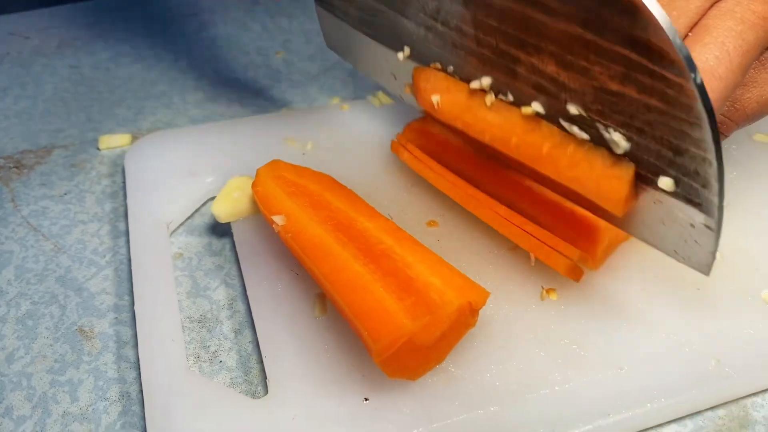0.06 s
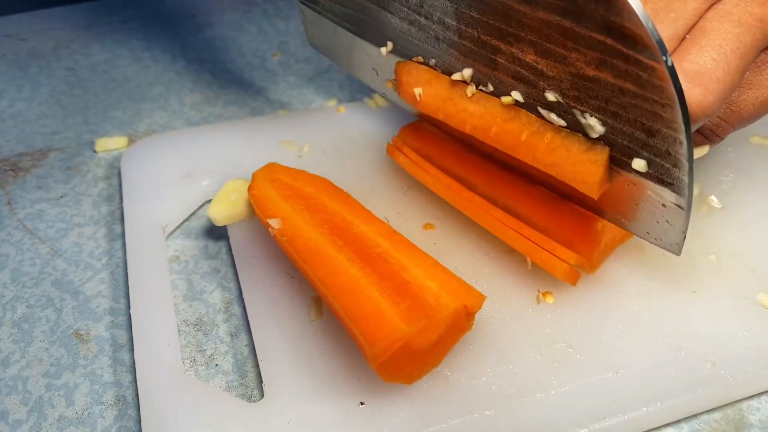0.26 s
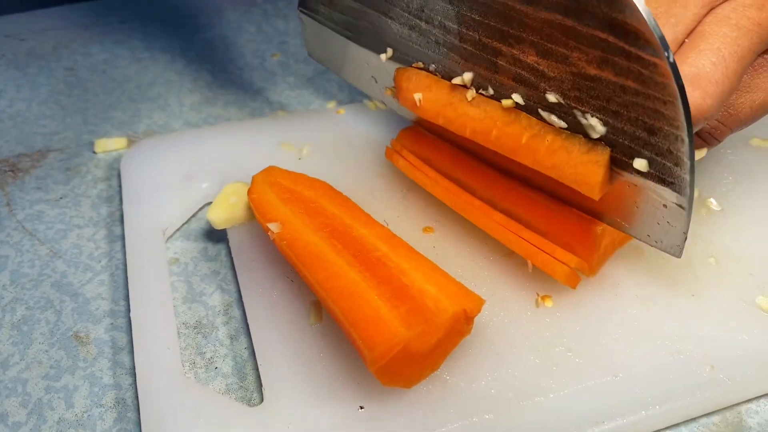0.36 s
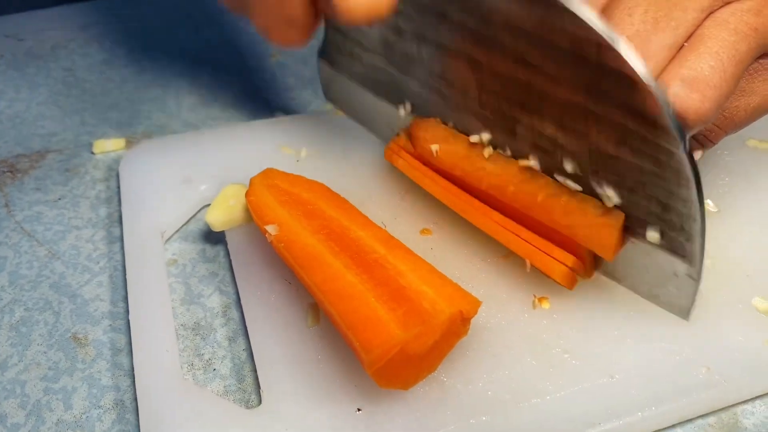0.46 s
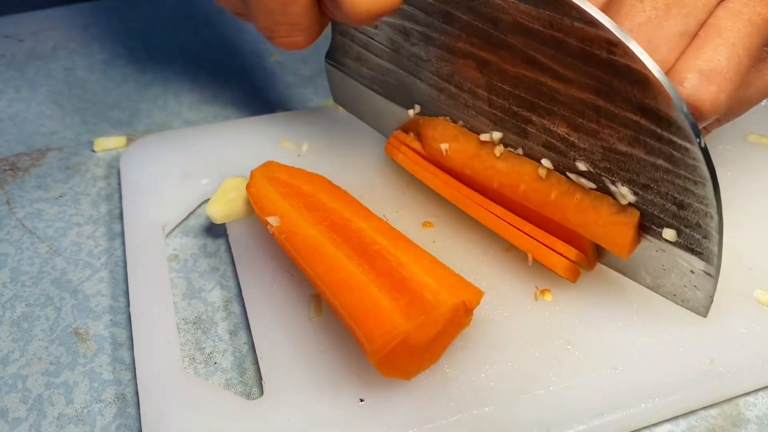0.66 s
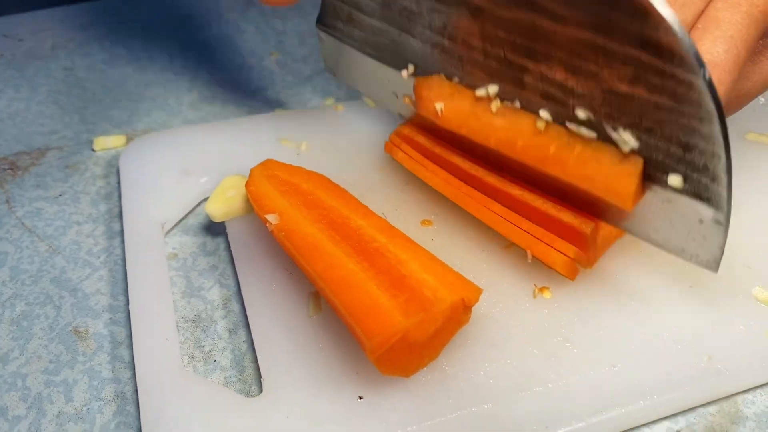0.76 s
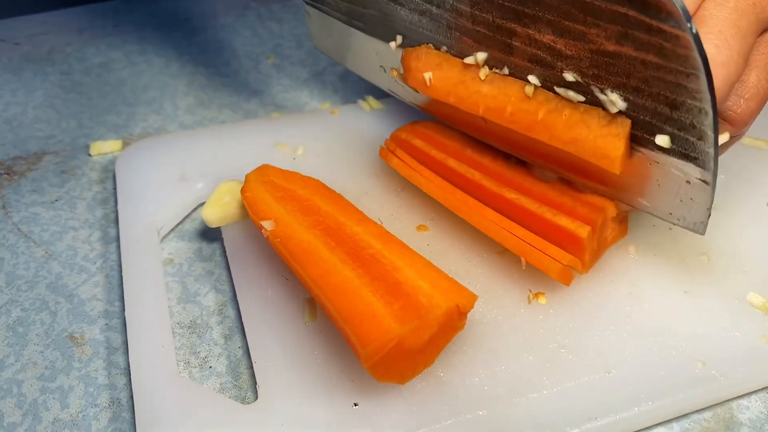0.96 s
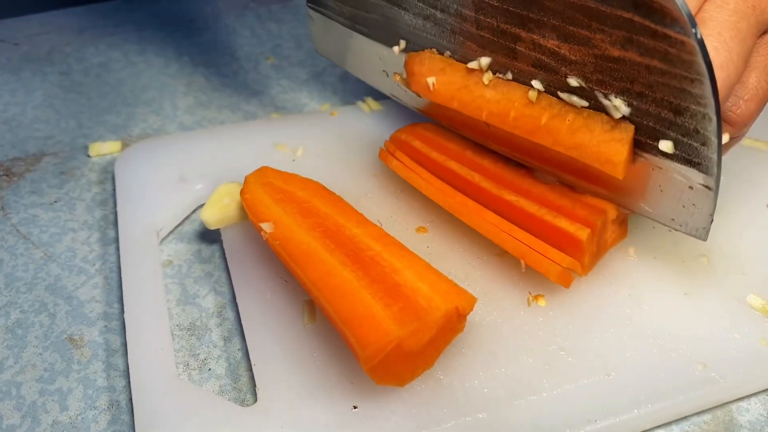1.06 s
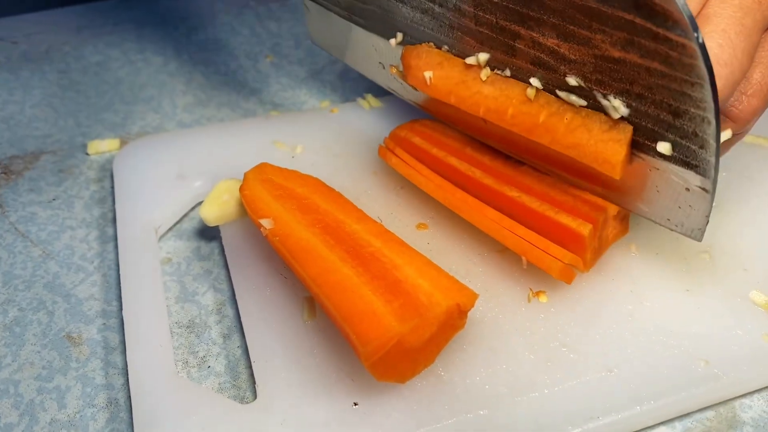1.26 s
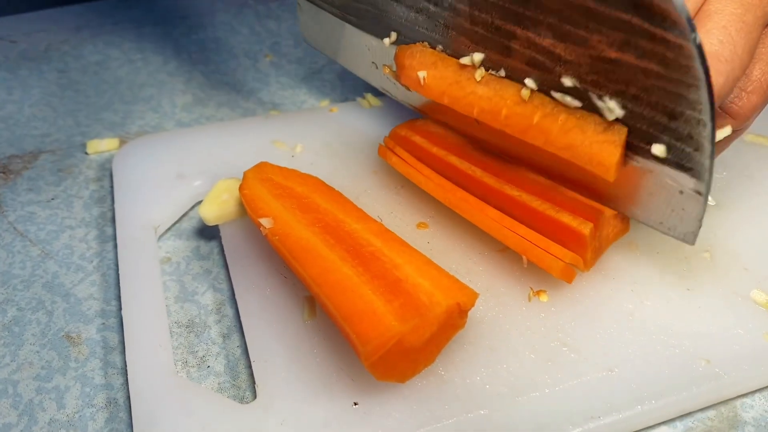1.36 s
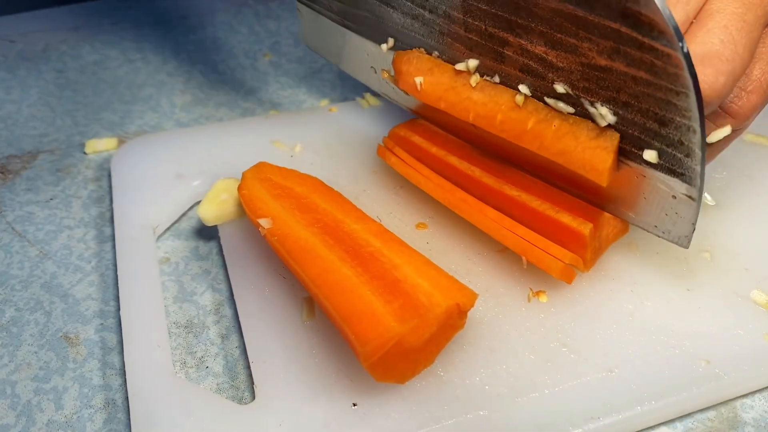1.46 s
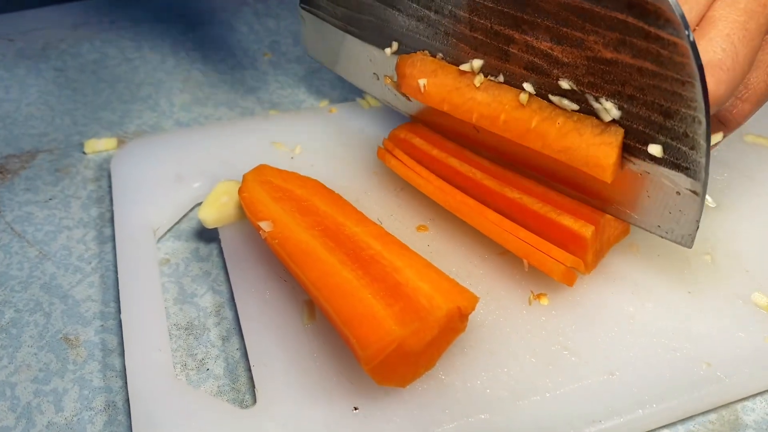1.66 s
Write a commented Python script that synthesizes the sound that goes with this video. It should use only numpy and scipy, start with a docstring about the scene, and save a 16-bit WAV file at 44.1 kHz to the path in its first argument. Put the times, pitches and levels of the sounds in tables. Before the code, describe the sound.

A cleaver chops a carrot on a plastic board, very close. A soft thump comes at 0.2 s, a firmer knock and click at 0.4, then a brief wet-crisp crunch at 0.48 slams into a loud, clipped bang at 0.5, with a small settling tap at 0.54. Faint ticks follow, with a dull thump at 1.42. Short room echo, low rumble, light hiss and faint high whine continue beneath.

```python
"""Carrot cut on a plastic board

In a kitchen, close to a phone's microphones, a cleaver is set on a carrot, crunches through and bangs on the board.
Contacts ring the board's modes and send a late, sagging thump through board and counter.
Edge ticks and squeaks are brief tone pings, some scratchy, with a struck blade ring; dense noise grains crunch.
A rumble, a banded treble hiss and a faint whine lie beneath; the bang overloads the phone.
"""
import sys
import numpy as np
from scipy import signal
from scipy.fft import rfft, irfft
from scipy.io import wavfile
from scipy.ndimage import uniform_filter1d

SR = 44100
rng = np.random.default_rng(int(sys.argv[2]) if len(sys.argv) > 2 else 0)


def to_wav(s):
    """Save 16-bit WAV."""
    ch = np.atleast_2d(s).T  # columns
    pcm = np.round(np.clip(ch, -1, 1) * 32767)  # PCM
    wavfile.write(sys.argv[1], SR, pcm.astype(np.int16))


N = 74970
TIME_S = np.arange(N) / SR
BINS_HZ = np.fft.rfftfreq(N, 1 / SR)


def undb(db):
    """Decibels to amplitude, 20 dB per factor of ten."""
    return 10 ** (np.asarray(db) / 20)


def unit(x):
    """Scale a signal to an RMS of one."""
    return x / np.sqrt(np.mean(x ** 2))


def read(table, col=1):
    """A table column on the FFT bins, joined by straight lines on a log frequency axis."""
    t = np.array(table)
    return np.interp(np.log(np.maximum(BINS_HZ, 1)), np.log(t[:, 0]), t[:, col])


def colour(x, table):
    """Shape by a spectrum, falling away gently below it and steeply above."""
    low_edge = np.minimum(BINS_HZ / table[0][0], 1) ** 2
    high_edge = np.minimum(table[-1][0] / (BINS_HZ + 1), 1) ** 40
    return irfft(rfft(x) * undb(read(table)) * low_edge * high_edge, N)


def curve(table, col):
    """A table column over time, joined by straight lines."""
    t = np.array(table)
    return np.interp(TIME_S, t[:, 0], t[:, col])


def walk(rate):
    """Random levels held 1 / rate s and slewed; spread near 1."""
    k = int(SR / rate)
    held = np.repeat(rng.standard_normal(N // k + 1), k)
    return 1.84 * uniform_filter1d(uniform_filter1d(held, k), k)[:N]


def decay(t, t60):
    """Exponential die-away, 60 dB down after t60 seconds."""
    return np.exp(-np.log(1000) * t / t60)


def modes(t, table):
    """Sum of struck modes, each a decaying sine at its own pitch."""
    return sum(undb(db) * decay(t, t60) * np.sin(2 * np.pi * hz * t) for hz, db, t60 in table)


WHINE_HZ, WHINE_DB = 3940, -75
WHINE_SWELL_DB, WHINE_AT_S, WHINE_SPAN_S = 10, 0.77, 0.14


def whine():
    """A faint tone of steady pitch whose level wanders and swells once."""
    swell = WHINE_SWELL_DB * np.exp(-((TIME_S - WHINE_AT_S) / WHINE_SPAN_S) ** 2)
    return undb(WHINE_DB + 2 * walk(4.6) + swell) * np.sin(2 * np.pi * WHINE_HZ * TIME_S)


MID_DB = -34.5  # RMS of the mid before flicker and drift
FLICKER_DB, FLICKER_RATE_HZ = 1.06, 12.36
DRIFT_HZ = (850, 3800, 5800, 20000)  # edges of the three drifting treble ranges
UPPER_SWING = 2.24  # from 2 to 3.8 kHz the drift is this much wider
# background colour: pitch_hz, level_db (density per Hz, relative)
ROOM_MID_SPECTRUM = [(20, -47), (45, -8.5), (55, 3.5), (72, -2.5), (136, -5), (233, -13), (301, -13.5),
                     (400, -21.5), (520, -27), (840, -37), (1300, -37), (2120, -45.5), (3000, -53),
                     (3350, -56), (3700, -53), (4200, -52.5), (4680, -34), (5100, -41.5), (5900, -55.5),
                     (6600, -38.5), (7500, -34.5), (7900, -44.5), (8350, -67), (8900, -46), (10700, -48.5),
                     (11300, -61)]
# background side against mid: pitch_hz, level_db
ROOM_SIDE_SPECTRUM = [(40, -26), (150, -13.5), (400, -5.5), (1000, 3), (3000, -4), (5000, -2), (7400, -1),
                      (10500, -4.5)]
# treble level, used about its mean: time_s, middle_db, lower_db, upper_db
TREBLE_DRIFT = [(0, -62, -67.5, -59.5), (.18, -65, -70, -63), (.39, -59.5, -64, -61),
                (.62, -61, -66.5, -61), (.78, -59.5, -63.5, -57.5), (.87, -56, -74, -59.5),
                (.97, -61.5, -63, -62.5), (1.1, -63, -62, -61.5), (1.25, -61, -59.5, -63),
                (1.36, -62.5, -61, -62), (1.6, -62, -65, -61.5), (1.66, -62.5, -60, -57.5),
                (1.7, -56, -60, -52)]


def kitchen():
    """Rumble and hiss in half-octave bands that flicker alone; the treble also drifts slowly."""
    mid, side = (colour(rng.standard_normal(N), ROOM_MID_SPECTRUM) for _ in range(2))
    gain = undb(MID_DB) / np.std(mid)
    mid = gain * mid
    side = gain * irfft(rfft(side) * undb(read(ROOM_SIDE_SPECTRUM)), N)
    pair, out = rfft(np.array([mid + side, mid - side])), 0
    levels = [curve(TREBLE_DRIFT, k) for k in range(1, 4)]
    drift = [np.zeros(N)] + [level - np.mean(level) for level in levels]
    for centre_hz in 20 * 2 ** np.arange(0, 9.5, .5):
        # overlapping triangular bands
        weight = np.clip(1 - np.abs(2 * np.log2((BINS_HZ + 1) / centre_hz)), 0, 1)
        swing = UPPER_SWING if 2000 < centre_hz < 3800 else 1
        slow_db = swing * drift[np.searchsorted(DRIFT_HZ, centre_hz)]
        out = out + irfft(pair * weight, N) * undb(FLICKER_DB * walk(FLICKER_RATE_HZ) + slow_db)
    return out + whine()


ECHO_DB, ECHO_T60_S, ECHO_LOW_HZ, ECHO_TOP_HZ = -15, 0.064, 600, 4170


def walls(dry):
    """Short room echo: decaying band-limited noise, drawn separately for left and right."""
    t = np.arange(SR // 4) / SR
    tail = rng.standard_normal((2, len(t))) * decay(t, ECHO_T60_S) * np.minimum(t / 0.004, 1)
    band = signal.butter(1, [ECHO_LOW_HZ, ECHO_TOP_HZ], "band", fs=SR, output="sos")
    tail = signal.sosfilt(band, tail)
    tail = tail / np.sqrt(np.sum(tail[0] ** 2))
    return undb(ECHO_DB) * signal.fftconvolve(dry[None], tail, axes=1)[:, :N]


PING = 0.34  # size of a tick's own tone against its scratch
# blade modes: pitch_hz, level_db, t60_s
BLADE_MODES = [(1344, 0, 0.027), (2074, 3.5, 0.027), (2470, 0.5, 0.017), (3800, -3.5, 0.02),
               (5550, -4, 0.015)]
# edge ticks and squeaks: start_s, level_db, pitch_hz, length_s, scratch_db, blade_db
EDGE_TICKS = [(0.136, -34, 2690, 0.0033, -19, -16), (0.19, -46, 9950, 0.0085, -30, -35),
              (0.203, -41.5, 2740, 0.0036, -0.5, -4.5), (0.4, -23.5, 4350, 0.0028, -2, -6.5),
              (0.539, -22.5, 1580, .0035, -30, -35), (0.678, -40.5, 5700, 0.0059, -34, -21),
              (0.858, -47, 9750, 0.025, -5, -40), (0.929, -37, 2750, 0.0032, -21, -16),
              (1.2481, -45.5, 2720, 0.0045, -5, -24), (1.416, -37.5, 9760, 0.0026, -5.5, 0),
              (1.647, -37.5, 5850, 0.0035, -6.5, -27)]


def ticks():
    """Edge ticks and squeaks: brief tone pings, some scratchy, with a struck blade ring."""
    out, t = np.zeros(N + SR), np.arange(2048) / SR
    noise = rng.standard_normal((len(EDGE_TICKS), 2048))
    blade = modes(t, BLADE_MODES)
    blade = blade / np.sqrt(np.sum(blade ** 2))
    for (s, db, hz, length, scratch_db, blade_db), n in zip(EDGE_TICKS, noise):
        shape = (t / length * 2) * np.exp(1 - t / length * 2)  # peaks at half the length
        scratch = undb(scratch_db) * n * shape
        ping = PING * shape * np.sin(2 * np.pi * hz * t)
        late_blade = np.roll(blade, int(length * SR / 2))
        blade_ring = undb(blade_db) * np.sqrt(length * SR) * late_blade
        i = int(s * SR)
        out[i:i + 2048] += undb(db) * (scratch + ping + blade_ring)
    # overall tick colour: pitch_hz, level_db
    return colour(out[:N], [(600, 2), (3000, -3.5), (7300, 1.5), (8400, -5.5), (9600, 5.5),
                            (10500, 0), (11500, -13), (15000, -15)])


LATE_S = 0.0094  # arrival of a 100 Hz bending wave; higher ones come sooner
# board modes: pitch_hz, level_db, t60_s
BOARD_MODES = [(42.8, -3.5, 0.16), (73.6, -11, 0.27), (129.5, -2.5, 0.048), (174, -14.5, 0.233),
               (238.4, -3, 0.11), (295.5, -2.5, 0.062), (345, -6.5, 0.072), (580, -9, 0.071),
               (832.6, -6.5, 0.035), (1135, 6.5, 0.01), (1573, -16, 0.044), (1932, -19, 0.046)]


def board_ring():
    """Response of the board to one blow; low modes swell late, as slow bending waves do."""
    t = np.arange(SR // 3) / SR
    return sum((1 - np.exp(-(t / (LATE_S * 100 / mode[0])) ** 2)) * modes(t, [mode])
               for mode in BOARD_MODES)


SNAP_S = .4772  # fibres start to tear
STOP_S = .4995  # blade meets the board
SETTLE_HZ = 3500  # the slice settles with a duller crackle
GRAIN_DB = 1.5  # mean of the grains' random boost
PUSH_HZ = (122, 396)  # band of the board shaken by the push
# blade through the carrot: time_s, crunch_db, push_db (on the board)
CUT_LEVELS = [(.405, -67.5, -70), (.418, -47, -25.5), (.435, -39, -41), (.456, -29, -28),
              (.4765, -32.5, -54), (.479, -16.5, -15), (.490, -18.5, -18), (.4985, -17.5, 2.5),
              (.503, -30, -23), (.515, -37, -38), (.545, -52.5, -24), (.62, -87, -59)]
# colour of the bright crunch, with a gap near 12 kHz: pitch_hz, level_db (density per Hz, relative)
CRUNCH_SPECTRUM = [(290, -36), (500, -12), (1140, -4), (1400, -9.5), (2850, -5.5), (4010, -11.5),
                   (5410, -4), (6330, -7.5), (9580, -0.5), (11000, -6.5), (12200, -46), (14600, -17)]
# colour of the dull shear around it: pitch_hz, level_db (density per Hz, relative)
SHEAR_SPECTRUM = [(290, -45), (500, -15), (1920, -3), (3170, -9.5), (4030, -16), (5480, -10.5), (8380, -15),
                  (9200, -9), (10600, -11), (12000, -37), (15600, -65)]


def cut():
    """Dense grains of bursting cells: dull shear, then a bright tear; the push shakes the board."""
    grains = rng.standard_normal(N) * undb(GRAIN_DB * rng.exponential(size=N))
    tear_in = np.clip((TIME_S - SNAP_S) / 0.0006, 0, 1)
    tear_out = np.clip((STOP_S - TIME_S) / 0.0016 + 1, 0, 1)
    torn = tear_in * tear_out
    shear = unit(colour(grains, SHEAR_SPECTRUM))
    settling = signal.sosfilt(signal.butter(2, SETTLE_HZ, fs=SR, output="sos"), shear)
    shear = np.where(TIME_S < STOP_S, shear, settling)
    crunch = (1 - torn) * shear + torn * unit(colour(grains, CRUNCH_SPECTRUM))

    ring = board_ring()[:1500] * np.hanning(3000)[1500:]
    ring = signal.sosfilt(signal.butter(2, PUSH_HZ, "band", fs=SR, output="sos"), ring)
    force = rng.standard_normal(N) * undb(curve(CUT_LEVELS, 2))
    push = signal.fftconvolve(force, ring)[:N] / np.sqrt(np.sum(ring ** 2))
    return crunch * undb(curve(CUT_LEVELS, 1)) + push


SAG_S = 0.0034  # time constant of the thump's falling pitch
# contacts that shake the board; pitch_hz is where the thump settles:
# start_s, ring_db, contact_s, thump_lag_s, thump_db, pitch_hz, time_to_peak_s, sharpness, head_start_cycles
BOARD_KNOCKS = [(0.2069, -14, 0.0049, .0001, -13, 88.6, 0.016, 2, 0.89),
                (0.4013, -6.5, 0.002, .0001, -6, 97.7, 0.01, 2.7, 1.25),
                (.4800, -34, 0.0011, .0001, -18.5, 211, 0.0066, 2.9, 0.38),
                (.4980, 3.5, 0.000038, .003, 4, 87.3, 0.0073, 1.44, 1.09),
                (0.5386, -17.5, 0.0009, .0001, -14.5, 74, 0.0083, 2.2, 0.88),
                (.932, -36, 0.0046, .0001, -24.5, 83.6, 0.011, 0.96, 0.87),
                (1.418, -14.5, 0.0033, .0001, -9, 89.6, 0.02, 2.95, 0.87)]


def knocks():
    """Each contact rings the board, duller if longer, and thumps the counter with a pitch that sags."""
    out, ring = np.zeros(N + SR), board_ring()
    t = np.arange(len(ring)) / SR
    for s, ring_db, contact, lag, thump_db, hz, peak, sharp, ahead in BOARD_KNOCKS:
        cycles = hz * t + ahead * (1 - np.exp(-t / SAG_S))
        shape = (t / peak * np.exp(1 - t / peak)) ** sharp
        struck = uniform_filter1d(ring, max(int(contact * SR), 1), mode="constant")
        i = int(s * SR)
        out[i:i + len(t)] += undb(ring_db) * struck
        i += int(abs(lag) * SR)
        out[i:i + len(t)] += undb(thump_db) * shape * np.sin(2 * np.pi * cycles)
    return out[:N]


# phase between the two microphones: pitch_hz, left_lead_radians
PORT_PHASE = [(50, 0.17), (150, 0.11), (350, 0.27), (700, 0.78), (1300, 1.08), (3000, 1.18), (9500, 1.57)]
# level between the two microphones: pitch_hz, left_minus_right_db
PORT_LEAN = [(60, 0.5), (700, -1), (1400, -3), (2800, 4), (5500, 7), (10000, -0.8)]


def microphones(dry):
    """Two ports hear the close sound with a phase and level difference, split evenly between them."""
    turn = np.exp(.5j * read(PORT_PHASE)) * undb(read(PORT_LEAN) / 2)
    return irfft(rfft(dry) * np.array([turn, 1 / turn]), N)


def scene():
    """The close cutting sounds in stereo, their echo and the kitchen beneath."""
    close = knocks() + ticks() + cut()
    echo = walls(close)
    return microphones(close) + echo + kitchen()


CEILING = .995  # full scale is 1
TOP_HZ = 15200


def record(dry):
    """The phone clips the bang and cuts the top; both ends are faded over 150 samples."""
    bent = np.clip(dry, -CEILING, CEILING)
    fade = np.minimum(np.minimum(np.arange(N), np.arange(N)[::-1]) / 150, 1)
    return signal.sosfilt(signal.ellip(12, .02, 60, TOP_HZ, fs=SR, output="sos"), bent * fade)


dry = scene()
out = record(dry)
to_wav(out)
```